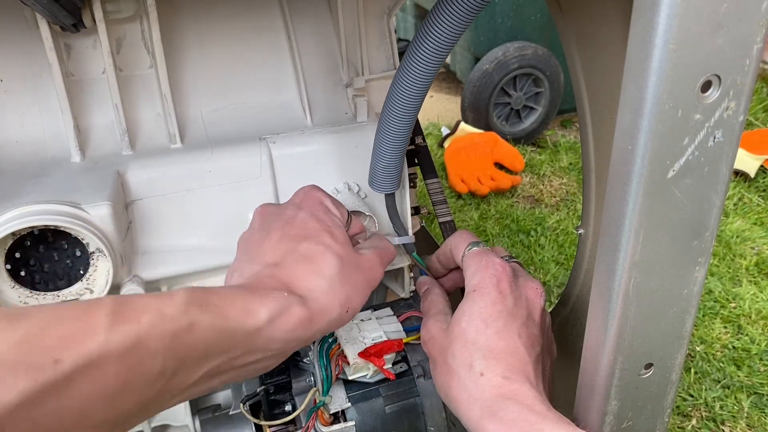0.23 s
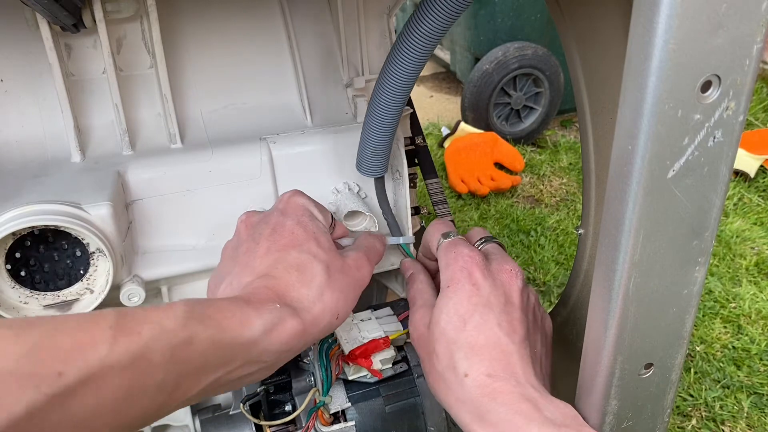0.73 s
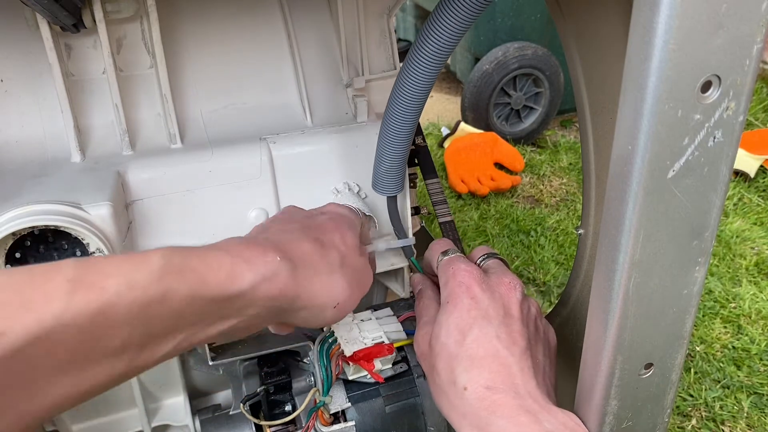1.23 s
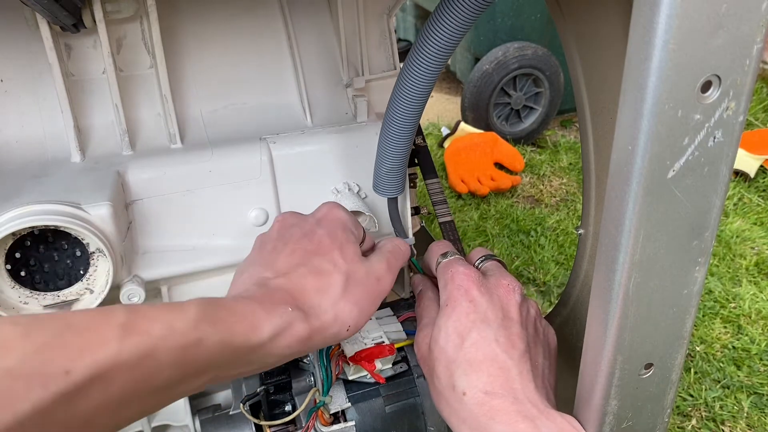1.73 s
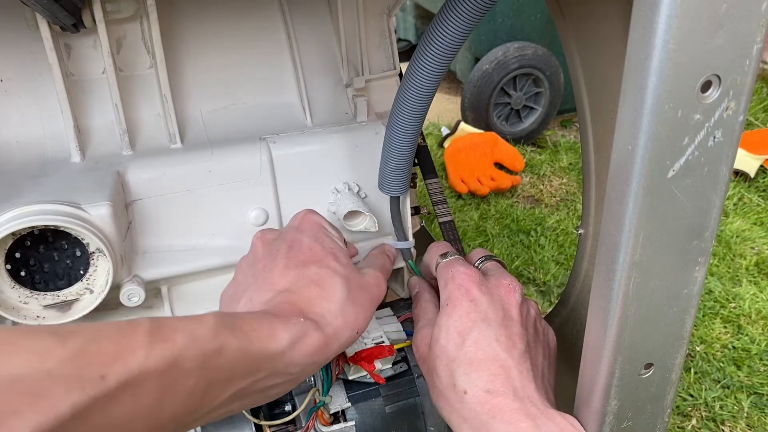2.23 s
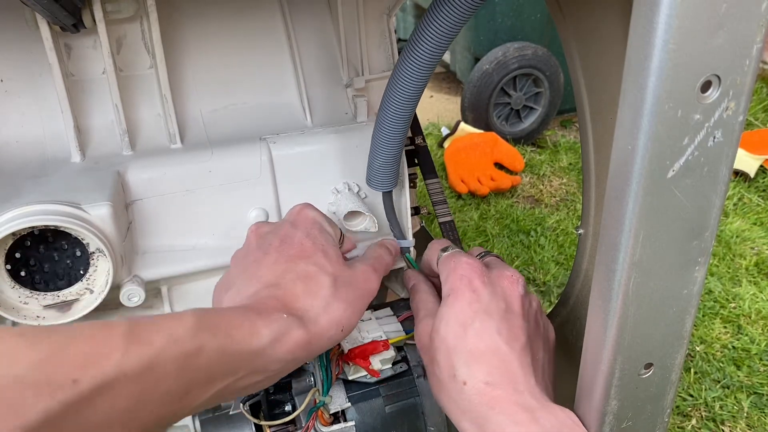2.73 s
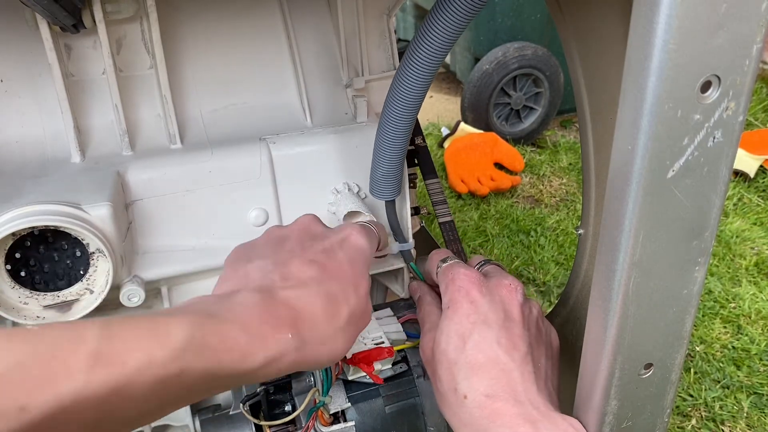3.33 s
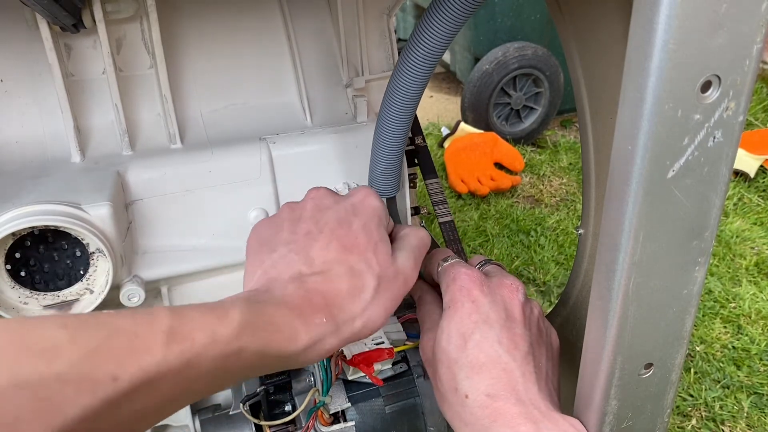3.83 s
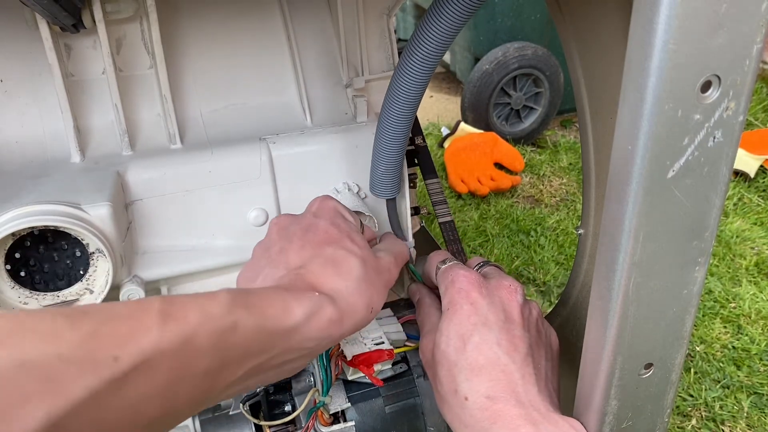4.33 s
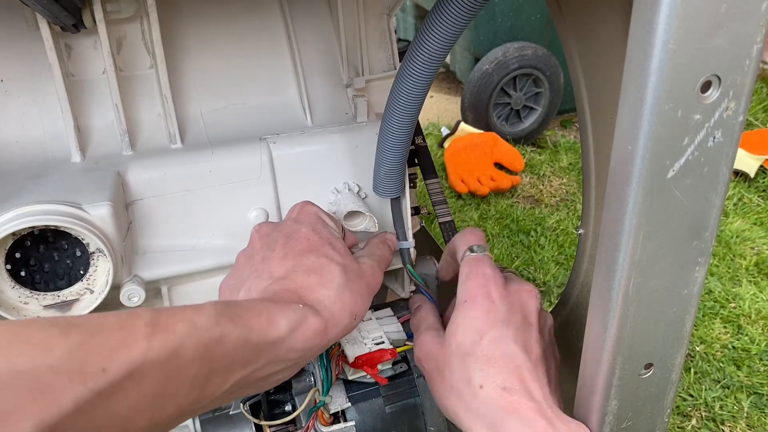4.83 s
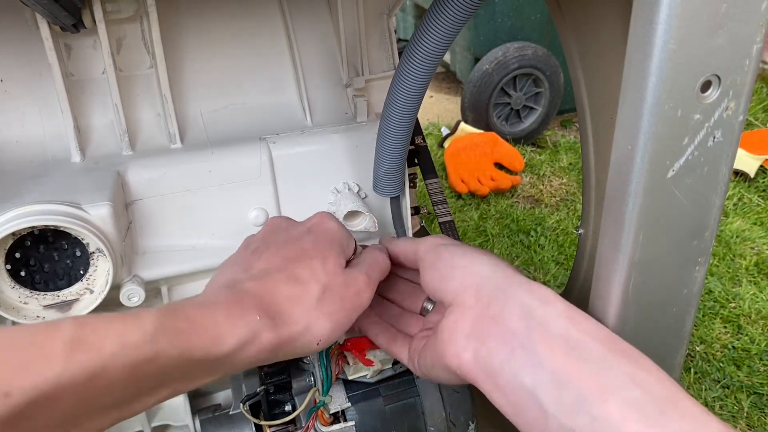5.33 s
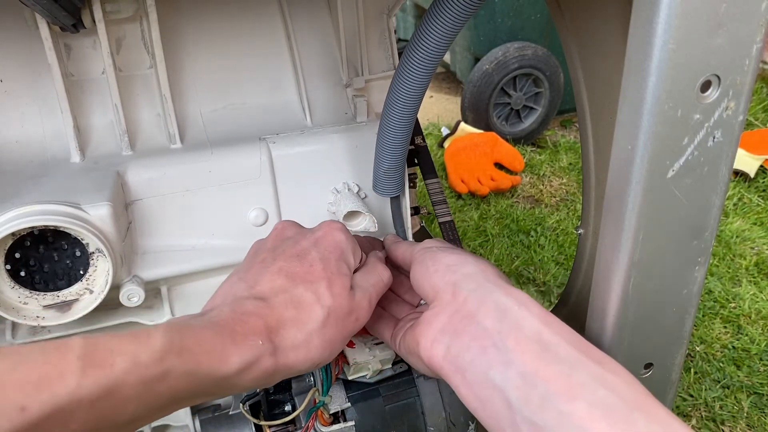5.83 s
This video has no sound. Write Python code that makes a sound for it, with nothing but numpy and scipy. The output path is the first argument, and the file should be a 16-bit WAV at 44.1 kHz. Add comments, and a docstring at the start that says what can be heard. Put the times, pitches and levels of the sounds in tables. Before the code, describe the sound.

A thin plastic tie is pulled through its lock close to the microphone. A fast zip of tiny clicks slows into single snaps, then pauses with soft finger scuffs. A second quick run follows, then one isolated snap and a slow series of harder clicks. Hollow plastic resonates faintly underneath. Skin rubs and a bright tick follow, in quiet outdoor air with a low breeze rumble.

```python
"""Plastic tie pulled through its lock

A hand in a garden pulls a tie through its lock, tooth by tooth, on the plastic tub of an appliance.
Each tooth snaps over the pawl: an impulse and a noisy slip excite decaying modes of tie and tub.
Filtered noise bursts make the finger scuffs and bright ticks; low held modes make the dull knocks.
Shaped noise makes the breeze on the microphone ports, the quiet outdoor air and the rub of skin."""
import sys
import numpy as np
from scipy import signal
from scipy.fft import rfft, irfft
from scipy.io import wavfile
from scipy.ndimage import uniform_filter1d

SR = 44100
rng = np.random.default_rng(int(sys.argv[2]) if len(sys.argv) > 2 else 0)


def master_out(mix):
    """Clip the mix to full scale and print it as 16-bit PCM to the path in sys.argv[1]."""
    frames = np.transpose(np.atleast_2d(mix))
    ceiling = np.clip(frames, -1, 1)
    pcm = np.round(ceiling * 32767).astype(np.int16)
    wavfile.write(sys.argv[1], SR, pcm)


N = 267995  # scene length in samples
EVENT_SAMPLES = 6000

# breeze on the ports, spectrum: frequency_hz, relative_db
BREEZE_SPECTRUM = [(12, -38), (20, -22.5), (35, -15.5), (54, 4.5), (155, -9.5), (231, -15), (300, -18.5),
                   (390, -24), (660, -120)]
# breeze on the ports, course: time_s, rms_db before the ports
GUSTS = [(0.0, -52.5), (0.3, -48.5), (0.65, -53.5), (1.17, -52), (1.3, -55.5), (1.78, -58.5), (2.05, -55),
         (2.4, -54), (2.9, -55), (3.2, -57), (3.38, -54.5), (3.7, -56), (4.1, -58), (4.52, -50.5),
         (4.63, -58.5), (4.69, -65), (4.9, -61.5), (5.35, -57), (5.53, -52.5), (6.08, -56)]
# outdoor air, spectrum: frequency_hz, relative_db
AIR_SPECTRUM = [(59, -48.5), (100, -5.5), (320, -13.5), (360, -7.5), (468, -9), (631, -10.5), (1380, -20.5),
                (1490, -21.5), (2190, -25), (12000, -63.5), (15600, -85.5), (22000, -120)]
# outdoor air, dipping briefly after the last tooth: time_s, rms_db before shaking and ports
AIR_LEVEL = [(0.0, -54.5), (0.7, -58.5), (1.0, -60.5), (2.8, -59.5), (3.0, -61), (3.3, -56), (3.55, -60),
             (4.1, -59.5), (4.6, -57), (4.7, -65), (5.05, -58), (5.35, -55), (5.53, -59.5), (6.08, -60.5)]
# skin rubbing on plastic, spectrum: frequency_hz, relative_db
RUB_SPECTRUM = [(800, -4), (2000, 4.5), (4000, 0.5), (7000, -5), (10000, -9.5), (13000, -8), (15500, -22.5),
                (16100, -85.5)]
# skin rubbing on plastic, course: time_s, rms_db before shaking and ports
RUBBING = [(0, -64), (.85, -77.5), (1.22, -71.5), (1.8, -80), (2.42, -75), (2.6, -87), (2.8, -75),
           (2.96, -80), (3.33, -65), (3.5, -70.5), (3.75, -80), (4.1, -80), (4.62, -70), (4.72, -75.5),
           (4.9, -72.5), (5.28, -64), (5.55, -72.5), (5.7, -71), (5.97, -81), (6.08, -70.5)]
# around each tooth the shaken tub adds a low wash and the strap a rub: width, then dB over the tub's blows
SHAKE_S, SHAKE_WASH_DB, SHAKE_RUB_DB = 0.023, -28.5, -46

# teeth passing the pawl: start_s, snap_db before radiation
TEETH = [(0.0114, -23), (0.0298, -22), (0.0458, -25), (0.0598, -25), (0.0734, -27), (0.0894, -29),
         (0.1034, -30), (0.1184, -31), (0.1336, -29), (0.1484, -30), (0.1645, -32), (0.1795, -29),
         (0.1955, -29), (0.2124, -29), (0.2294, -29), (0.2478, -30), (0.2668, -32), (0.2872, -33),
         (0.3122, -29), (0.3426, -28), (0.3825, -23), (0.4404, -22), (0.5112, -25), (1.8507, -31),
         (1.9041, -25), (1.931, -29), (1.953, -34), (1.9789, -35), (2.0058, -32), (2.0253, -28),
         (2.0423, -32), (2.0577, -25), (2.0737, -24), (2.0901, -22), (2.1076, -24), (2.1231, -21),
         (2.137, -18), (2.151, -20), (2.168, -23), (2.1924, -26), (2.2223, -27), (2.2667, -28),
         (2.3486, -28), (3.3079, -18), (4.1579, -23), (4.1939, -29), (4.2467, -33), (4.3101, -16),
         (4.3745, -15), (4.4243, -14), (4.4937, -14), (4.5855, -17)]
# how loud the parts ring as the grip shifts and the loop closes, before radiation:
# time_s, pawl_db, head_db, strap_db, loop_db, tub_db
GRIP = [(0.0, -37, -41.5, -47.5, -47, -44), (0.1, -41, -42.5, -49, -48.5, -44.5),
        (0.22, -39.5, -43, -43.5, -45, -47), (0.3, -43, -41, -44.5, -41.5, -48.5),
        (0.42, -43, -42.5, -61, -42.5, -53.5), (0.51, -39, -60, -48.5, -35, -42),
        (1.85, -46, -38.5, -41.5, -38, -46.5), (1.9, -39.5, -37.5, -39, -36.5, -38.5),
        (1.98, -41, -37.5, -42, -42.5, -46.5), (2.04, -43, -35, -42.5, -38, -41.5),
        (2.125, -42.5, -47, -36.5, -40, -46.5), (2.18, -44, -32, -33.5, -43.5, -43.5),
        (2.27, -45.5, -42, -45.5, -43.5, -44.5), (2.35, -47, -40.5, -38, -48, -47),
        (3.31, -36.5, -51.5, -36.5, -39.5, -42.5), (4.16, -36, -44, -38.5, -53, -39.5),
        (4.25, -38.5, -43.5, -40, -57, -42), (4.31, -52, -41, -33, -59, -40.5),
        (4.4, -44, -37.5, -32, -43, -41.5), (4.49, -42, -31, -38.5, -63, -58),
        (4.59, -54, -38, -43, -58, -58)]
# how strongly each part radiates: snap_db, pawl_db, head_db, strap_db, loop_db, tub_db, pop_db
RADIATION_DB = (4.1, 8.7, 8.66, 9.9, 9.1, 10.56, 10)
POP_DB, POP_FOLLOWS = 3, 0.4  # the pop goes with the tub's dB and a share of the snap's dB
# colour of the bare snap: frequency_hz, relative_db
SNAP_SPECTRUM = [(300, -16), (2000, -19.5), (4000, -21.5), (7000, -12.5), (9000, -20.5), (12000, -12.5),
                 (14000, -2.5), (15500, 1.5), (16200, -9.5), (17500, -50.5)]
# short dull part of the snap: frequency_hz, relative_db
POP_SPECTRUM = [(400, -14), (1300, -4), (2100, 0), (3300, -5), (5000, -20)]
# modes of the pawl: frequency_hz, relative_db, t60_s
PAWL_MODES = [(10300, 0, .008), (11000, -1, .008), (11800, -2, .008), (12400, -5, .008)]
# modes of the head of the tie: frequency_hz, relative_db, t60_s
HEAD_MODES = [(6070, -4, .01), (6600, -2, .012), (6900, 0, .014), (7440, -2, .012), (7760, -3, .012)]
# modes of the strap: frequency_hz, relative_db, t60_s
STRAP_MODES = [(4310, -6, .016), (4640, -2, .018), (4940, 0, .016), (5120, -3, .012), (5390, -3, .014)]
# modes of the loop: frequency_hz, relative_db, t60_s
LOOP_MODES = [(2500, -3, .009), (2750, 0, .011), (3100, -2, .01), (3450, -3, .009), (3830, -4, .009)]
# modes of the hollow tub: frequency_hz, relative_db, t60_s
TUB_MODES = [(384, -9.5, .05), (550, -1, 0.091), (649, 1, .06), (710, -1.5, 0.093), (800, -9, .05),
             (960, 1.5, 0.076), (1052, 2.5, 0.079), (1160, -5.5, 0.11), (1348, -1, 0.085),
             (1720, -4.5, 0.046), (1951, -1.5, .06), (2130, -3, 0.057)]
# walls of the cabinet near the tie: delay_s, gain_db
ECHOES = [(.0022, -13), (.0066, -20)]
# damping of the scattered sound in the cabinet: frequency_hz, t60_s
SCATTER_T60 = [(1000, .06), (5000, .04), (10000, .045), (15000, .036)]

# fingers scuffing or tapping the tub: start_s, tub_db, loop_db, strap_db, hiss_db, length_s
SCUFFS = [(0.645, -64, -55, -44, -52.5, 0.0082), (0.726, -31, -44, -51, -38, 0.0072),
          (0.76, -48.5, -54.5, -62, -71, 0.044), (0.788, -45, -62, -58, -70, 0.016),
          (0.807, -62, -67, -65, -57.5, 0.044), (1.071, -78, -57, -73, -45, 0.017),
          (1.238, -52, -63, -69, -66, 0.013), (1.278, -50.5, -66, -76, -55.5, 0.027),
          (1.451, -57, -72, -65, -80, 0.012), (2.821, -72, -64, -66, -56.5, 0.094),
          (2.893, -58, -59, -68, -46, 0.014), (3.076, -49.5, -58, -62, -82, 0.015),
          (3.19, -41, -36.5, -41.5, -38, 0.0042), (3.268, -62, -53, -48, -55, 0.0053),
          (3.477, -67.5, -76, -68, -56.5, 0.012), (3.649, -44, -49, -48.5, -55.5, 0.016),
          (3.865, -74, -72, -72, -69, 0.016), (4.853, -49.5, -74, -58, -57, 0.011),
          (5.128, -64, -60, -65, -80, 0.016), (5.164, -48.5, -58, -65, -77, 0.032),
          (5.242, -57, -74, -60, -47.5, 0.058), (5.448, -67, -79, -70, -56, 0.029)]
SCUFF_SCRAPE_DB = -4  # relative to the ring of the strap
# dull knocks on the hollow tub: start_s, level_db, pitch_hz, push_s, t60_s
KNOCKS = [(3.192, -43, 369, 0.029, 0.065), (4.311, -44.5, 161, 0.0076, 0.038),
          (4.3115, -41, 457, 0.0038, 0.035), (4.3755, -47, 480, 0.0022, 0.023),
          (4.4255, -48.5, 524, 0.0023, 0.014), (5.255, -50, 371, 0.039, 0.03),
          (5.54, -49, 257, 0.012, 0.028)]
# dry bright ticks as the fingers leave the tie: start_s, sizzle_db, pop_db
TICKS = [(5.6272, -15.5, -27.5), (5.7912, -29, -40)]
# sizzle of a tick: frequency_hz, relative_db
TICK_SPECTRUM = [(1000, -19), (4000, -27), (7500, -15), (10400, -3), (12000, -11.5), (13500, -6.5),
                 (15300, -1.5), (16000, -22), (17500, -34)]
# pop of a tick: frequency_hz, relative_db
TICK_POP_SPECTRUM = [(600, -26), (1400, -6), (2000, 0), (4500, -6), (7000, -18)]

# likeness of the sound at the two ports: frequency_hz, coherence_0_to_1
ALIKE = [(60, 0.99), (300, 0.7), (700, 0.4), (1500, 0.16), (2200, 0.53), (4500, 0.74), (5800, 0.05),
         (6600, 1), (9000, 1), (16000, 1)]
# level difference of the ports: frequency_hz, left_over_right_db
BALANCE_DB = [(60, 0.5), (700, 0.5), (2500, 2), (4500, 5.5), (6200, 4.5), (7500, -1), (9500, 1.5),
              (16000, -1)]
# phase difference of the ports: frequency_hz, left_lead_rad
LEAD = [(0, 0), (600, .3), (950, 4.1), (1400, 5), (1750, 8), (4700, 6.3), (6000, 1.8), (7000, 0),
        (15400, -12.57), (22050, -22.5)]
EDGE_HZ = 17100  # upper band limit


def amp(db):
    """Decibel law: 20 dB is a factor of ten in amplitude."""
    return 10 ** (np.asarray(db) / 20)


def read(points, hz):
    """Logarithmic pitch scale: a table is interpolated over log frequency."""
    f, value = np.transpose(points)
    return np.interp(np.log(hz + 1), np.log(f + 1), value)


def peaked(x):
    """Peak normalisation: the greatest excursion becomes 1."""
    return x / np.abs(x).max()


def unit(x):
    """Energy normalisation: the mean energy of the rows becomes 1."""
    return x / np.sqrt((x ** 2).sum() / len(x))


def add(mix, s, sound):
    """Superposition: a sound is added to the mix from time s."""
    part = mix[:, round(s * SR):][:, :sound.shape[1]]
    part += sound[:, :part.shape[1]]


def colour(x, points):
    """Minimum-phase filtering: the log spectrum alone fixes a causal response."""
    log_gain = np.log(amp(read(points, np.fft.rfftfreq(1024, 1 / SR))))
    circle = np.r_[log_gain, log_gain[-2:0:-1]]
    spectrum = np.exp(np.conj(signal.hilbert(circle)))
    taps = np.fft.ifft(spectrum).real[:512]
    taps = taps / np.linalg.norm(taps)
    return signal.oaconvolve(x, taps[None], axes=1)[:, :x.shape[1]]


def impulse(delay_s):
    """Ideal blow: a force one sample long, alike on both paths."""
    blow = np.zeros((2, EVENT_SAMPLES))
    blow[:, round(delay_s * SR)] = 1
    return blow


def puff(decay_s, rise_s):
    """Shaped noise: a soft start and an exponential fall."""
    t = np.arange(EVENT_SAMPLES) / SR
    noise = rng.standard_normal((2, len(t)))
    return noise * (1 - np.exp(-t / rise_s)) * np.exp(-t / decay_s)


def ring(modes, force, spread_db, turn):
    """Modal synthesis: a force drives damped sines, one row for each path to the ports."""
    hz, db, t60 = np.transpose(modes)[:, :, None]
    t = np.arange(EVENT_SAMPLES) / SR
    # each blow lands a little differently in level and in phase (turn in radians)
    level_draw, phase_draw = rng.standard_normal((2, 2, len(modes), 1))
    order = np.arange(len(modes))[:, None]
    # modes start out of step; every other mode flips on the second path
    start = np.array([order ** 2, order ** 2 + np.pi * order])
    decay = amp(db + spread_db * level_draw - 60 * t / t60)
    waves = decay * np.sin(2 * np.pi * hz * t + start + turn * phase_draw)
    return unit(signal.fftconvolve(waves.sum(1), force, axes=1)[:, :len(t)])


def bed(points, level_db, patchy_db, size):
    """Random-phase synthesis: noise spectra with drifting patches follow a level curve."""
    hz = np.fft.rfftfreq(size, 1 / SR)
    frames = 4 * N // size + 5
    real, imaginary = rng.standard_normal((2, 2, len(hz), frames))
    patches = rng.standard_normal((len(hz), frames))
    patches = uniform_filter1d(patches, size=9, axis=0)
    patches = uniform_filter1d(patches, size=9, axis=1)
    gain = amp(read(points, hz)[:, None] + patchy_db * patches / patches.std())
    spectra = (real + 1j * imaginary) * gain
    x = signal.istft(spectra, nperseg=size, noverlap=3 * size // 4)[1][:, :N]
    return amp(level_db) * x / x.std()


def breeze():
    """Flow noise: moving air on the ports rumbles, strongest at low frequencies."""
    level_db = np.interp(np.arange(N) / SR, *np.transpose(GUSTS))
    return bed(BREEZE_SPECTRUM, level_db, patchy_db=0.85, size=4096)


def shaken(points, shake_db, rows):
    """Power addition: smoothed blows on the tub raise a level curve in dB."""
    t = np.arange(N) / SR
    # row[0] is the start, row[-2] the tub's dB
    blows = sum(amp(2 * row[-2]) * np.exp(-((t - row[0]) / SHAKE_S) ** 2) for row in rows) / SHAKE_S
    rest = amp(2 * np.interp(t, *np.transpose(points)))  # doubled dB gives power
    return 10 * np.log10(rest + amp(2 * shake_db) * blows)


def outdoor_air(rows):
    """Diffuse noise: quiet outdoor air, with the low wash of the shaken tub."""
    return bed(AIR_SPECTRUM, shaken(AIR_LEVEL, SHAKE_WASH_DB, rows), patchy_db=1.9, size=1024)


def skin_rub(rows):
    """Friction noise: skin rubs on plastic, and the strap rubs around each tooth."""
    return bed(RUB_SPECTRUM, shaken(RUBBING, SHAKE_RUB_DB, rows), patchy_db=3.5, size=256)


def teeth():
    """Level curves: each tooth has its own snap; the grip sets how loud the parts ring."""
    s, snap = np.transpose(TEETH)
    at, *rings = np.transpose(GRIP)
    levels = [np.interp(s, at, db) for db in rings]  # pawl, head, strap, loop, tub
    pop = levels[-1] + POP_DB + POP_FOLLOWS * snap  # follows tub and snap
    return np.transpose([s, snap, *levels, pop])


def scatter():
    """Frequency-dependent absorption: dense reflections lose treble first, over a faint longer tail."""
    hz, frame_s, z = signal.stft(puff(0.79, 0.00085), SR, nperseg=128)
    fade = amp(-60 * frame_s / read(SCATTER_T60, hz)[:, None])
    tail = amp(-38.5 - 60 * frame_s / 0.61)
    return signal.istft(z * (fade + tail), SR, nperseg=128)[1][:, :EVENT_SAMPLES]


def tooth(levels_db, cabinet):
    """Slip and impact: the pawl slips, then snaps; tie and tub ring and the cabinet reflects."""
    snap, pawl, head, strap, loop, tub, pop = amp(np.add(levels_db, RADIATION_DB))
    blow = impulse(.0009)
    slip = amp(-20) * puff(.0006, .0005)
    click = snap * peaked(colour(blow + slip, SNAP_SPECTRUM))
    parts = ((PAWL_MODES, pawl), (HEAD_MODES, head), (STRAP_MODES, strap), (LOOP_MODES, loop))
    tie = sum(gain * peaked(ring(modes, blow + slip, spread_db=1.5, turn=.5)) for modes, gain in parts)
    echoes = sum(amp(db) * np.roll(click + tie, round(s * SR), axis=1) for s, db in ECHOES)
    # the shared cabinet response, with a fresh part for each tooth
    tail = unit(cabinet + .8 * scatter())
    wash = signal.fftconvolve(amp(-4) * click + amp(-1.0) * tie, tail, axes=1)[:, :EVENT_SAMPLES]
    hum = tub * peaked(ring(TUB_MODES, blow, spread_db=2, turn=.45))
    dull_pop = pop * peaked(colour(blow, POP_SPECTRUM))
    return click + tie + echoes + wash + hum + dull_pop


def scuff(tub_db, loop_db, strap_db, hiss_db, length):
    """Rough contact: a short noisy force shakes tub and tie, and hisses."""
    length = max(length, .001)
    thud = colour(puff(length, 0.0036), [(200, -13), (600, -2), (1200, -1.5), (2000, -1.0), (3500, -26.0)])
    tub = peaked(ring(TUB_MODES, puff(length / 2, 0.00068), spread_db=2.0, turn=1.09))
    tub = tub + 1.01 * peaked(thud)
    loop = peaked(ring(LOOP_MODES, puff(length, 0.00127), spread_db=3.0, turn=2.0))
    strap = peaked(ring(STRAP_MODES, puff(length, 0.00127), spread_db=3.0, turn=2.0))
    scrape = colour(puff(length, 0.001), [(2000, -18), (4000, 2), (6500, 12), (8000, -20), (9500, -83)])
    hiss = colour(puff(length, 0.0037), [(6000, -9.5), (8000, -7.0), (15500, -4.5), (16200, -54)])
    scraped_strap = strap + amp(SCUFF_SCRAPE_DB) * peaked(scrape)
    tie = amp(loop_db) * loop + amp(strap_db) * scraped_strap
    return amp(tub_db) * tub + tie + amp(hiss_db) * peaked(hiss)


def knock(db, hz, push, t60):
    """Sustained then free vibration: a low mode holds for the push, then dies, with a dull thump."""
    t = np.arange(EVENT_SAMPLES) / SR
    shape = (1 - np.exp(-t / 0.0024)) * amp(-60 * np.maximum(t - push, 0) / t60)
    mode = shape * np.sin(2 * np.pi * hz * t)
    thump = peaked(colour(puff(0.0076, 0.0026), [(60, -14.5), (180, -9.5), (320, -1.5), (600, -48)]))
    return amp(db) * (mode + 1.26 * thump)


def tick(sizzle_db, pop_db):
    """Sudden release: bright crackle with a faint longer tail, and a thin broad pop."""
    crackle = puff(0.0038, 0.00039) + amp(-14.5) * puff(0.012, 0.0016)
    sizzle = colour(crackle, TICK_SPECTRUM)
    pop = colour(impulse(.0007), TICK_POP_SPECTRUM)
    return amp(sizzle_db) * peaked(sizzle) + amp(pop_db) * peaked(pop)


def ports(paths):
    """Partial coherence: the right port shares part of the left's sound; the rest takes another path."""
    hz = np.fft.rfftfreq(N, 1 / SR)
    first, second = rfft(paths, axis=1)
    same = np.clip(read(ALIKE, hz), 0, 1)
    tilt = amp(read(BALANCE_DB, hz) / 2)  # half the difference on each side
    lead = np.exp(1j * np.interp(hz, *np.transpose(LEAD)))
    left = first * tilt * lead
    right = (same * first + np.sqrt(1 - same ** 2) * second) / tilt
    return irfft(np.array([left, right]), N, axis=1)


def scene():
    """Superposition: teeth, scuffs, knocks and ticks over breeze, air and rubbing."""
    rows = teeth()
    mix = breeze()
    mix += outdoor_air(rows)
    mix += skin_rub(rows)
    cabinet = scatter()
    for s, *levels_db in rows:
        add(mix, s, tooth(levels_db, cabinet))
    for table, play in ((SCUFFS, scuff), (KNOCKS, knock), (TICKS, tick)):
        for s, *settings in table:
            add(mix, s, play(*settings))
    return ports(mix)


def record(dry):
    """Band limiting: a linear-phase low-pass removes the highest treble."""
    taps = signal.firwin(255, EDGE_HZ, window=("kaiser", 9), fs=SR)
    return signal.oaconvolve(dry, taps[None], "same")


dry = scene()
out = record(dry)
master_out(out)
```